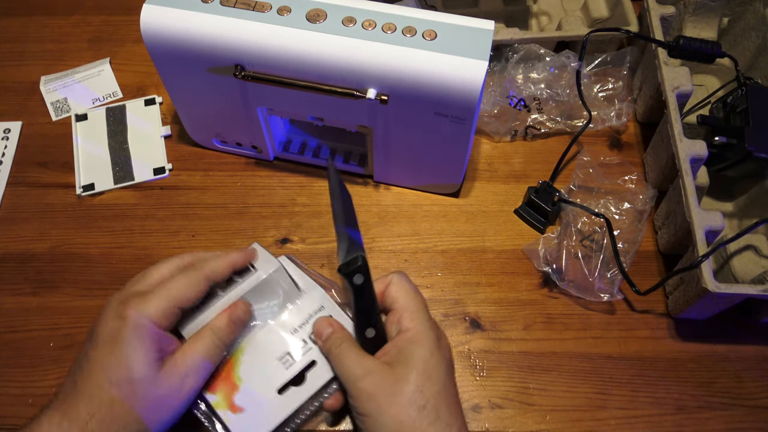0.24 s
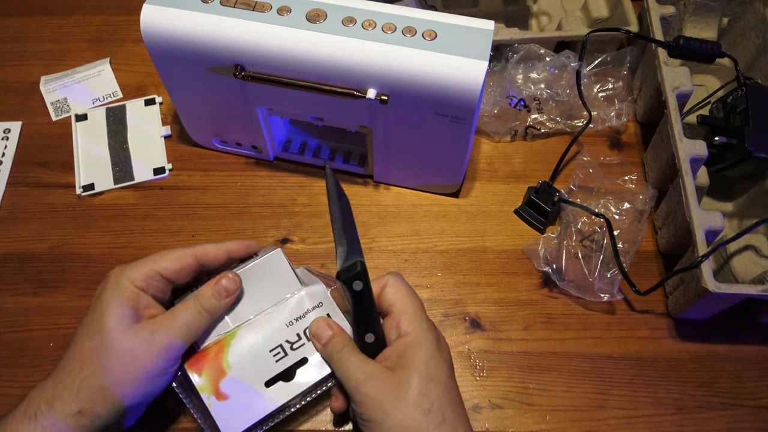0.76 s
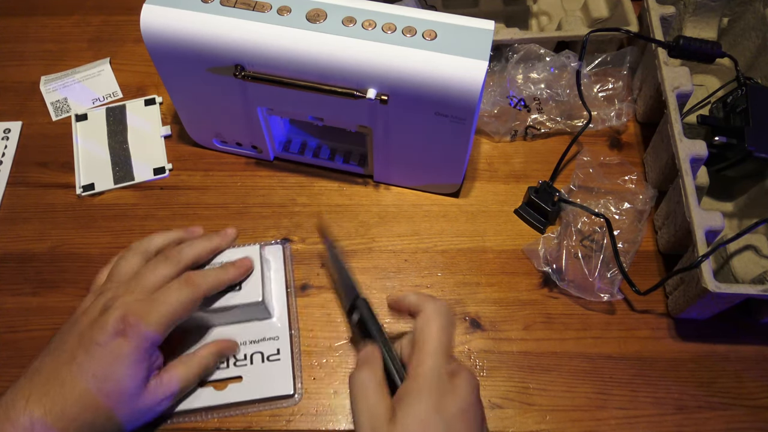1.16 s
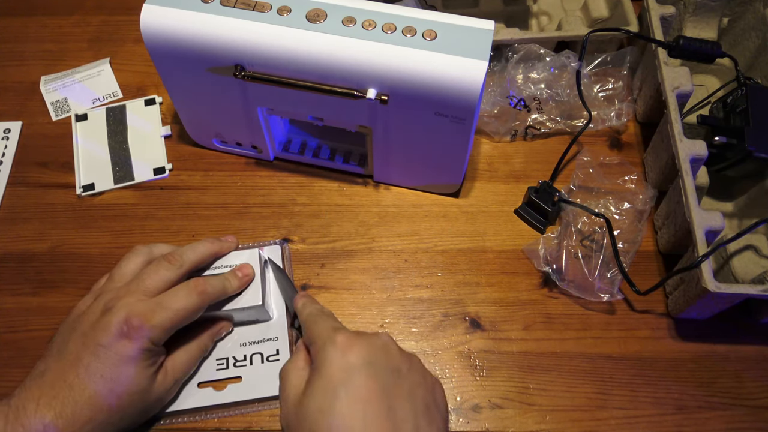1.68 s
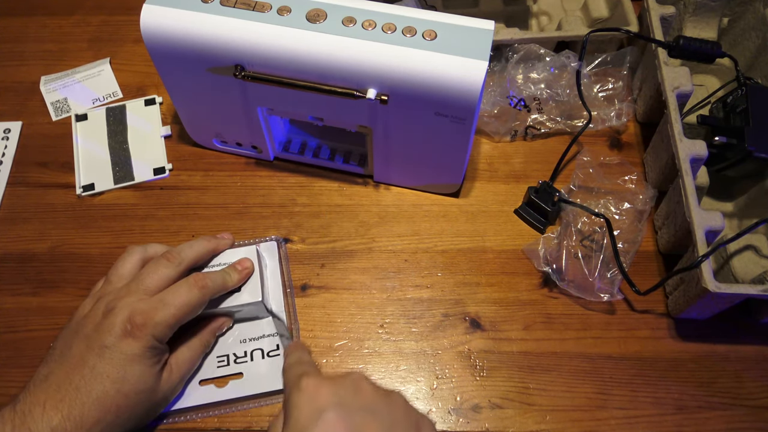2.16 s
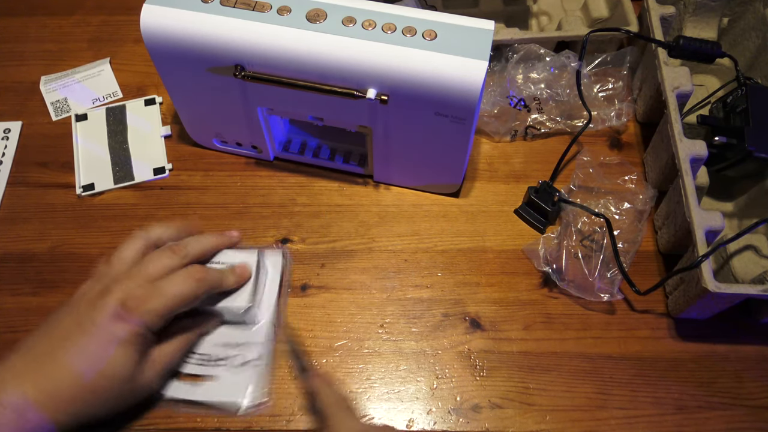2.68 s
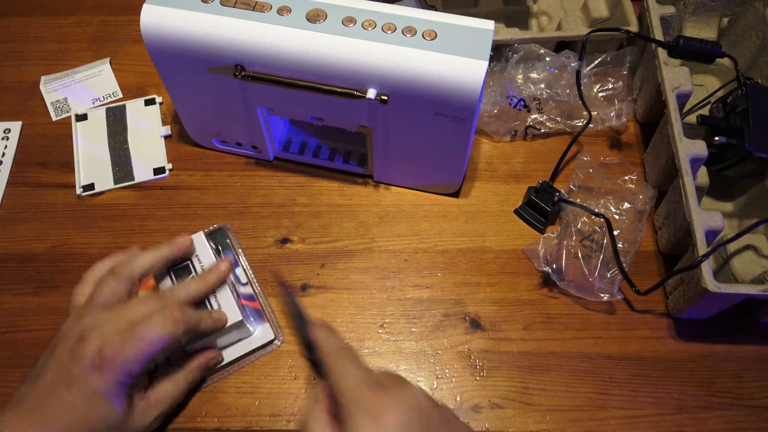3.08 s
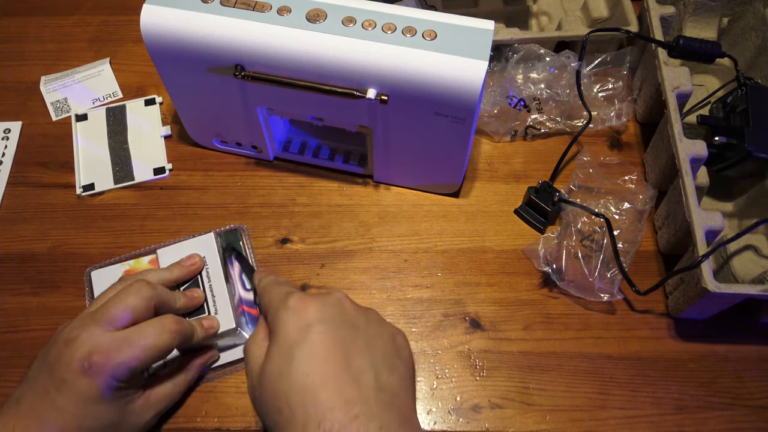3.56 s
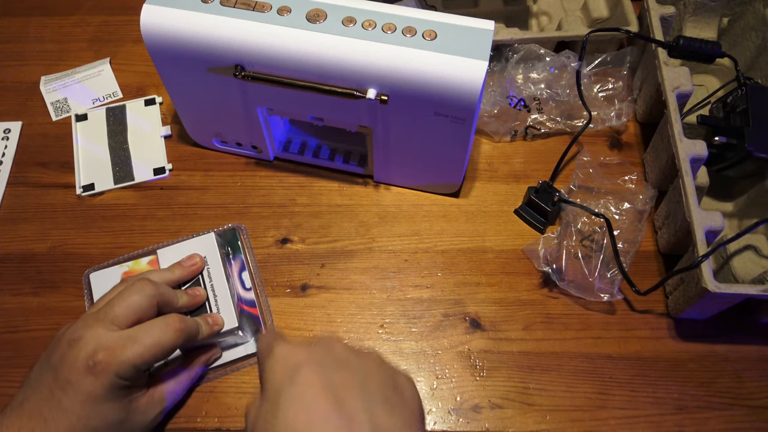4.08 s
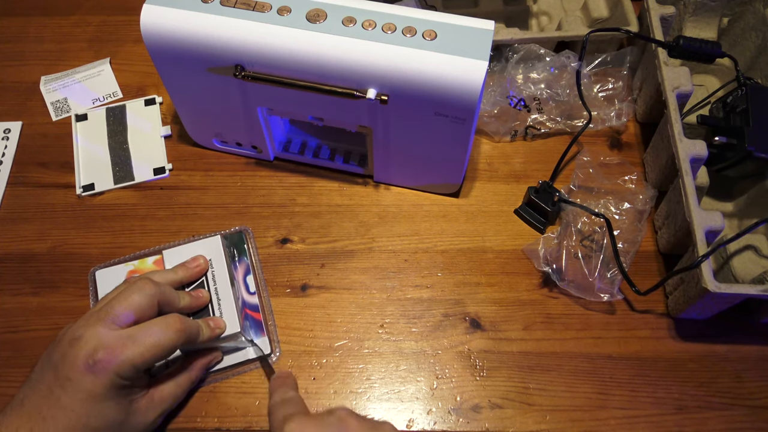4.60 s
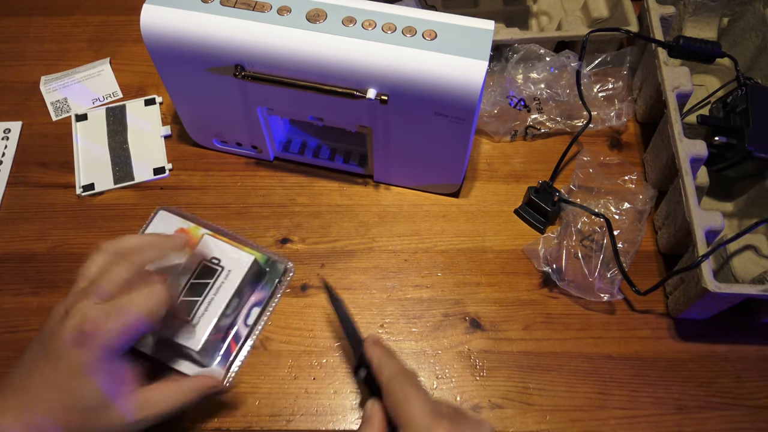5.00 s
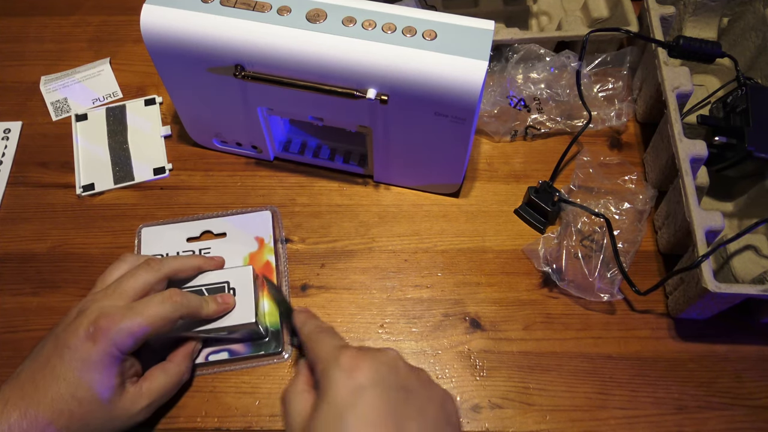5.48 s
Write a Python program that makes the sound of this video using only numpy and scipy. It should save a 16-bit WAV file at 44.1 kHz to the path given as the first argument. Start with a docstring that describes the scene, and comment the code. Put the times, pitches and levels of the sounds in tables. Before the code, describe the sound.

Close up in a small room with a faint dull background, someone cuts open hard plastic packaging on a wooden table. A short tear and sharp crackles lead to scrapes and hollow knocks. Twice the knife pushes through with a thump and a short rattle of the blade, the second time after a fast run of clicks and followed by a squeak. More scraping, knocking and snapping follow as the pack is shifted around.

```python
"""A stiff plastic blister pack is cut open with a knife on a wooden table in a small room. First the seam rips
in a run of fractures; the shell buckles in ticks and snaps, then knocks and scrapes on the wood. Near 2 s the
cut edge whines under friction and the blade breaks through, striking the modes of pack and table. Near 4 s its
serrated edge ratchets along the seam tooth by tooth, breaks through again and squeaks on its way out. Last, the
pack is turned with more scrapes, hollow knocks and snaps."""
import sys
import numpy as np
from scipy import signal
from scipy.fft import rfft, irfft
from scipy.io import wavfile
from scipy.ndimage import uniform_filter1d

SR = 44100
rng = np.random.default_rng(int(sys.argv[2]) if len(sys.argv) > 2 else 0)


def generate_wav(signal):
    """Clip the signal to [-1, 1] and save it as 16-bit WAV at the path in sys.argv[1]."""
    frames = np.transpose(np.atleast_2d(signal))
    scaled = np.clip(frames, -1, 1) * 32767
    pcm = np.round(scaled).astype(np.int16)
    wavfile.write(sys.argv[1], SR, pcm)


N = 253134
TIME = np.arange(N) / SR


def from_db(db):
    """Amplitude ratio of a level."""
    return 10 ** (np.asarray(db) / 20)


def rms_one(x):
    """Normalisation to unit rms."""
    return x / np.sqrt(np.mean(x ** 2) + 1e-20)


def at_hz(points, hz):
    """Interpolation of a spectrum on a log-frequency axis."""
    f, value = np.transpose(points)
    return np.interp(np.log(hz + 1), np.log(f), value)


def bins(size):
    """Frequencies of a discrete Fourier transform."""
    return np.arange(size // 2 + 1) * SR / size


def drift(per_s):
    """Random modulation of unit variance."""
    knots = rng.standard_normal(N // 8)
    return np.interp(TIME * per_s, np.arange(len(knots)), knots) * np.sqrt(3 / 2)


def swell(s, swell_s, hold_s, fade_s):
    """Exponential growth and decay: 20 dB up in swell_s, steady from time s, 20 dB down in fade_s."""
    early, late = np.maximum(s - TIME, 0), np.maximum(TIME - s - hold_s, 0)
    return from_db(-20 * np.minimum(early / swell_s + late / fade_s, 10))


def run_of(start_s, gap_s, jitter, count):
    """Relaxation oscillation: the times of nearly periodic releases."""
    return start_s + gap_s * (np.arange(count) + jitter * rng.standard_normal(count))


def slips(per_s, spread_db, hiss):
    """Shot noise: random impulses over fine friction hiss, at unit rms."""
    sizes = from_db(spread_db * np.minimum(rng.exponential(1, N), 4)) * rng.choice([-1, 1], N)
    impulses = sizes * (rng.random(N) < per_s / SR)
    return rms_one(rms_one(impulses) + hiss * rng.standard_normal(N))


def zones(hz):
    """Shelving weights of bass and treble at each frequency."""
    return at_hz([(550, 1), (1100, 0)], hz), at_hz([(2800, 0), (6000, 1), (14000, 1.3)], hz)


def causal(db):
    """Minimum-phase response of a given magnitude: nothing sounds before the contact."""
    cepstrum = irfft(np.log(from_db(db)))
    half = len(cepstrum) // 2
    cepstrum[1:half] *= 2
    cepstrum[half + 1:] = 0
    return np.exp(rfft(cepstrum))


def peak(hz, centre_hz, width_hz):
    """Lorentzian resonance curve of unit height."""
    return 1 / (1 + (2 * (hz - centre_hz) / width_hz) ** 2)


def resonate(drive, peaks):
    """Forced response of parallel resonances, at unit mean power gain."""
    shape = sum(from_db(db) * peak(bins(N), hz, width) for hz, width, db in peaks)
    return irfft(rfft(drive) * causal(20 * np.log10(rms_one(shape))), N)


# Background spectrum: f/Hz, relative level/dB
BACKGROUND_SPECTRUM = [(25, -14), (55, 6.5), (100, -6), (200, 5), (500, -6.5), (1100, -1.5), (2300, -14.5),
                       (6000, -16), (12000, -21), (16000, -24)]
def room_tone(level_db):
    """Stationary noise, weighted to low frequencies, gives a dull background."""
    spectrum = rfft(rng.standard_normal(N)) * from_db(at_hz(BACKGROUND_SPECTRUM, bins(N)))
    return from_db(level_db) * rms_one(irfft(spectrum, N))


# Reverberation time of the room: f/Hz, T60/s
ROOM_T60 = [(150, 0.58), (500, 0.24), (2000, 0.26), (6000, 0.28), (14000, 0.21)]
def reverberation(x, wet_db, first_s, size=32768):
    """A diffuse field builds up after the first reflection and decays exponentially, slowest in the bass."""
    t, tail = np.arange(size) / SR, 0
    octaves_hz = 80 * 2 ** np.arange(9.)
    for low, high in zip(octaves_hz, octaves_hz[1:]):
        bandpass = signal.butter(2, [low, high], "band", fs=SR, output="sos")
        band = signal.sosfilt(bandpass, rng.standard_normal(size))
        tail = tail + band * from_db(-60 * t / at_hz(ROOM_T60, np.sqrt(low * high)))
    tail *= np.clip(t / first_s - 1, 0, 1)
    return from_db(wet_db) * signal.fftconvolve(x, tail / np.sqrt(np.sum(tail ** 2)))[:N]


# Stereo width: f/Hz, side gain/dB
SIDE_GAIN = [(60, -15), (250, -20), (700, -17), (1400, -24), (2200, -30), (3800, -27), (6000, -17),
             (8000, -13), (14000, -12)]
# Stereo balance: f/Hz, left over right/dB
BALANCE = [(60, -1), (170, -.3), (350, 1.6), (700, 1.4), (1400, .2), (2800, .1), (5600, .4), (14000, 1.2)]
def stereo(mid, diffuse, reflection_s=.0037, reflected=.8):
    """Decorrelation: a lateral reflection and diffuse noise set two nearby receivers slightly apart."""
    hz, spectrum = bins(N), rfft(mid)
    reflection = reflected * spectrum * np.exp(-2j * np.pi * hz * reflection_s)
    side = from_db(at_hz(SIDE_GAIN, hz)) * (reflection + rfft(diffuse))
    lean = from_db(at_hz(BALANCE, hz) / 2)
    return irfft(np.array([(spectrum + side) * lean, (spectrum - side) / lean]), N)


# Loading of the cut edge: t/s at full load, swell/s, hold/s, fade/s, level/dB
EDGE_LOADS = [(1.86, 0.2, 0.097, .03, -56), (2.55, 0.17, .09, .05, -61.5)]
def whine(centre_hz, width_hz):
    """Resonant filtering: fine friction feeds one narrow band as the edge creeps through the plastic."""
    gain = sum(from_db(db) * swell(*timing) for *timing, db in EDGE_LOADS)
    spectrum = rfft(rng.standard_normal(N)) * peak(bins(N), centre_hz, width_hz)
    return gain * rms_one(irfft(spectrum, N))


# Resonances of the shell: f/Hz, width/Hz, boost/dB
SHELL_RESONANCES = [(1127, 51, 2.5), (1194, 86, 5), (1405, 103, 7), (1610, 30, 3.5), (2000, 210, 3),
                    (2570, 57, 1.5), (2980, 62, 5.5), (3660, 150, 2), (3910, 130, 2), (5910, 1700, 4.5),
                    (7820, 130, 4)]
def shell_db(colour, hz, share):
    """Source and filter: the shell's resonances lift a contact spectrum, normalised by its middle band."""
    lift_db = sum(boost * peak(hz, f, width) for f, width, boost in SHELL_RESONANCES)
    db = at_hz(colour, hz) + share * lift_db
    middle = (hz > 800) & (hz < 4000)
    return db - 10 * np.log10(np.mean(from_db(db) ** 2 * middle))


# Sliding of shell or blade: t/s at full speed, swell/s, hold/s, fade/s, level/dB, bass/dB, treble/dB
SLIDING_STROKES = [(0.003, .02, 0.01, 0.095, -43, 2, 7.5), (0.201, 0.11, 0.016, .05, -37, 1, 2),
                   (0.498, .2, 0.31, 0.08, -52.5, 9, 7), (0.875, 0.021, 0.029, 0.027, -30.5, 8.5, -4),
                   (0.907, 0.046, 0.11, 0.093, -36, -7, 6.5), (1.109, 0.068, 0.018, 0.033, -31, 7.5, 1),
                   (1.214, .03, 0.036, 0.24, -53, 4, -0.5), (1.47, .03, 0.084, 0.31, -50, -1, -1),
                   (1.684, 0.015, .025, 0.057, -42.5, 8, -22), (1.814, 0.099, 0.36, .05, -55, 5.5, 2),
                   (2.112, 0.29, 0.066, 0.2, -52.5, 13, 6.5), (2.687, 0.096, 0.076, .05, -40.5, 5.5, 1.5),
                   (2.772, 0.057, 0.069, .06, -27.5, -6, 3.5),
                   (2.932, 0.069, 0.032, 0.095, -38.5, 1.5, -2.5),
                   (3.083, 0.02, 0.013, 0.077, -38, 1.5, 3.5), (3.226, 0.024, 0.015, 0.035, -32.5, 0, 1),
                   (3.283, .05, .02, 0.17, -50.5, 4, -7), (3.604, 0.011, 0.0093, 0.03, -46, 8.5, -0.5),
                   (3.928, 0.034, 0.23, 0.18, -37, 9, 4.5), (4.288, .04, 0.033, 0.21, -46.5, 6.5, 3),
                   (4.464, .1, .07, .3, -58.5, 7, 6), (4.69, .03, .03, 0.09, -55, 6, 0),
                   (4.792, 0.022, 0.11, .05, -36, 2.5, -1.5), (4.909, 0.065, 0.034, 0.074, -28, 0, 0.5),
                   (5.022, 0.064, 0.041, .18, -50, 9, 1), (5.19, 0.036, 0.02, 0.1, -25, 1.5, 2),
                   (5.237, 0.051, 0.018, 0.017, -24, -7, 10), (5.392, 0.036, 0.01, 0.18, -48.5, 5, 5.5),
                   (5.69, 0.088, 0.045, .1, -50, -4, 2)]
def stroke_gains(holding_db=-75):
    """Incoherent strokes add in power, giving bass, middle and treble gains; the fingers never rest."""
    power = np.full((3, N), from_db(holding_db) ** 2)
    for *timing, db, low_db, high_db in SLIDING_STROKES:
        power += np.outer(from_db([db + low_db, db, db + high_db]), swell(*timing)) ** 2
    return np.sqrt(power)


# Spectrum of sliding contact: f/Hz, relative level/dB
SLIDE_SPECTRUM = [(40, -27), (130, -9.5), (260, -1.5), (600, 1), (1200, 3), (2000, 1), (3500, -5.5),
                  (6000, -8.5), (9000, -11.5), (12500, -21), (16000, -33)]
def sliding(gains, gain_db, judder_db):
    """Friction noise: dense slips shake the shell; pressure adds bass and sharp edges add treble."""
    hz = bins(N)
    bass, treble = zones(hz)
    grains = slips(per_s=1800, spread_db=0.0, hiss=0.74) * from_db(judder_db * drift(140))
    shaken = rfft(grains) * from_db(shell_db(SLIDE_SPECTRUM, hz, share=0.51))
    bands = [irfft(shaken * share, N) for share in (bass, 1 - bass - treble, treble)]
    return from_db(gain_db) * sum(band * gain for band, gain in zip(bands, gains))


# Spectrum of the tearing seam: f/Hz, relative level/dB
RIP_SPECTRUM = [(40, -46), (130, -9), (300, -8), (600, -2), (1050, 2), (2000, -1), (3500, -3.5),
                (6000, -7.5), (9000, -8), (12500, -17.5), (16000, -30)]
def rip(start_s, full_s, level_db):
    """Crack propagation: a run of tiny fractures starts abruptly, swells and dies away."""
    gain = from_db(level_db) * (TIME >= start_s) * swell(full_s, swell_s=0.043, hold_s=0.029, fade_s=0.086)
    fractures = slips(per_s=2700, spread_db=-1.5, hiss=0.97) * gain
    return irfft(rfft(fractures) * causal(shell_db(RIP_SPECTRUM, bins(N), share=0.21)), N)


def gripped(x, grips=4, ripple_db=4.4, spacing_hz=90, shifts_per_s=7, overlap_hz=6000):
    """Changing boundary conditions: fingers stiffen and damp the shell, shifting its peaks and dips."""
    hz, spectrum = bins(N), rfft(x)
    out, total = 0, 0
    for _ in range(grips):
        knots = ripple_db * rng.standard_normal(int(SR / spacing_hz))
        knots -= uniform_filter1d(knots, size=5)
        ripple = np.interp(hz / spacing_hz, np.arange(len(knots)), knots)
        ripple /= 1 + (hz / overlap_hz) ** 2  # modal overlap smooths the treble
        held = irfft(spectrum * causal(ripple), N) / np.sqrt(np.mean(from_db(ripple) ** 2))
        weight = np.exp(2 * drift(shifts_per_s))
        out = out + weight * held
        total = total + weight
    return out / total


# Knocks of pack and hand on the table: t/s, ring level/dB, f/Hz, click level/dB
HOLLOW_KNOCKS = [(0.873, -20, 890, -56), (1.0313, -20.5, 292, -30.5), (1.1003, -25, 690, -34),
                 (1.123, -18, 1210, -39), (1.168, -24, 475, -30.5), (1.586, -38.5, 500, -38.5),
                 (1.6866, -26.5, 1140, -55), (2.123, -49.5, 69.6, -61), (2.535, -29, 713, -40.5),
                 (2.7301, -23, 725, -37.5), (3.119, -23, 707, -48), (3.727, -32, 605, -55),
                 (4.324, -44.5, 66.5, -48), (4.8874, -16.5, 552, -30), (4.8986, -16, 740, -36),
                 (5.1737, -17.5, 820, -32.5), (5.1951, -20, 1120, -26), (5.279, -24, 490, -29),
                 (5.3634, -13.5, 1680, -58), (5.5757, -33.5, 558, -45)]
def knocks(gain_db, cycles, overtone_db, size=8192):
    """Damped free vibration: three modes of the hollow pack each lose 60 dB in the given cycles."""
    out, t = np.zeros(N + size), np.arange(size) / SR
    for s, db, hz, _ in HOLLOW_KNOCKS:
        at = int(s * SR)
        for ratio, mode_db in [(1, 0), (1.27, overtone_db), (rng.uniform(1.24, 2.95), overtone_db)]:
            turns = hz * ratio * t
            envelope = from_db(db + gain_db + mode_db - 60 * turns / cycles) * (1 - np.exp(-2 * turns))
            out[at:at + size] += envelope * np.sin(2 * np.pi * turns)
    return out[:N]


# Squeals of the blade in the slit: t/s, duration/s, first f/Hz, last f/Hz, level/dB
BLADE_SQUEALS = [(4.274, 0.025, 6400, 9500, -38), (4.277, .014, 11500, 13000, -45),
                 (4.292, 0.0183, 8970, 14900, -33), (4.351, .012, 15500, 9040, -38),
                 (4.36, .013, 9800, 15800, -44)]
def squeals(roughness_db, ring_t60, waver=.05, size=1024):
    """Fast stick-slip at the blade gives ragged gliding tones, smeared by the ringing shell."""
    tones = np.zeros(N)
    for s, length, first_hz, last_hz, db in BLADE_SQUEALS:
        progress = np.clip((TIME - s) / length, 0, 1)
        hz = first_hz + (last_hz - first_hz) * progress
        phase = 2 * np.pi * np.cumsum(hz * (1 + waver * drift(2500))) / SR
        tones += np.sin(np.pi * progress) * from_db(db + roughness_db * drift(700)) * np.sin(phase)
    shell = rng.standard_normal(size) * from_db(-60 * np.arange(size) / SR / ring_t60)
    return signal.fftconvolve(tones, shell * np.sqrt(2 / np.sum(shell ** 2)))[:N]


# Groan of the slit: t/s, slip rate f/Hz, level/dB
SLIT_GROAN = [(4.273, 720, -35), (4.282, 620, -33.5), (4.294, 585, -27.5), (4.308, 520, -51)]
def groan(slope_db, jitter=.012, harmonics=6):
    """Periodic stick-slip in the slit gives a harmonic series, strongest at the second harmonic."""
    s, hz, db = np.transpose(sorted(SLIT_GROAN))
    gain = (TIME >= s[0]) * (TIME <= s[-1]) * from_db(np.interp(TIME, s, db))
    phase = 2 * np.pi * np.cumsum(np.interp(TIME, s, hz) * (1 + jitter * drift(600))) / SR
    buzz = sum(from_db(slope_db * abs(k - 2)) * np.sin(k * phase) for k in range(1, harmonics + 1))
    return gain * rms_one(buzz)


# Resonances of the seam under the blade: f/Hz, width/Hz, relative level/dB
SEAM_RESONANCES = [(675, 880, -6), (1400, 160, -4), (1910, 450, 3), (3100, 1800, -9.5), (6330, 2600, -21)]
def ratchet(start_s, gap_s, level_db, scatter_db, grit, grit_s):
    """Serrated blade: each tooth catching on the seam sends a click and a little grit into the seam's
    resonances."""
    drive, t = np.zeros(N), np.arange(SR // 20) / SR
    for s in run_of(start_s, gap_s, jitter=0.17, count=12):
        at = int(s * SR)
        slip = (t == 0) + grit * np.exp(-t / grit_s) * rng.standard_normal(len(t))
        drive[at:at + len(t)] += from_db(level_db + scatter_db * rng.standard_normal()) * slip
    return resonate(drive, SEAM_RESONANCES)


# The knife breaks through and lands: t/s, thud level/dB, tilt/(dB/octave), twang level/dB, crack level/dB
KNIFE_LANDINGS = [(1.9475, -8.5, 2, -29, -18.5), (1.9792, -32, -8, -17, -17), (3.919, -6, 0, -38, -20),
                  (3.9622, -7, -2, -30, -13.5)]
# Modes of the pack pressed on the table: f/Hz, relative level/dB, T60/s
PACK_ON_TABLE_MODES = [(150, -28, .12), (214, -29, .2), (257, -18, .33), (301, -23, .3), (328, -12, .11),
                       (352, 0, .042), (394, -13, .1), (417, -23, .28), (496, -21, .12), (565, -19, .07),
                       (662, -11, .06), (735, -4, .04), (800, -17, .11), (1060, -24, .12), (1210, -23, .16)]
def thuds(scatter_db, radiation_hz, pivot_hz=350, size=32768):
    """Modal superposition: each landing rings pack and table; the small table radiates little deep bass."""
    out, t = np.zeros(N + size), np.arange(size) / SR
    for s, thud_db, tilt_db, _, _ in KNIFE_LANDINGS:
        at = int(s * SR)
        for k, (hz, db, t60) in enumerate(PACK_ON_TABLE_MODES):
            mode_db = thud_db + db + tilt_db * np.log2(hz / pivot_hz) + scatter_db * rng.standard_normal()
            out[at:at + size] += (-1) ** k * from_db(mode_db - 60 * t / t60) * np.sin(2 * np.pi * hz * t)
    return signal.sosfilt(signal.butter(2, radiation_hz, "high", fs=SR, output="sos"), out[:N])


# Resonances of the knife and the cut edge it bears on: f/Hz, width/Hz, relative level/dB
BLADE_RESONANCES = [(1450, 300, 1), (1780, 590, -1), (2960, 290, 2.5), (3400, 350, -4), (5300, 3600, -11.5)]
def twang(t60, attack, attack_s=0.0021):
    """Forced vibration: after landing, the blade chatters against the cut edge as it settles."""
    chatter = slips(per_s=6000, spread_db=2.0, hiss=1.0)
    settling = np.zeros(N)
    for s, _, _, db, _ in KNIFE_LANDINGS:
        age = np.maximum(TIME - s, 0)
        settling += (TIME > s) * from_db(db - 60 * age / t60) * (1 + attack * np.exp(-age / attack_s))
    return resonate(chatter * settling, BLADE_RESONANCES)


# Single snaps of the shell: t/s, level/dB, bass/dB, treble/dB
SHELL_SNAPS = [(0.0849, -41.5, 4, -27), (0.1224, -32.5, -3, -13), (0.1959, -12.5, -8, -1),
               (0.3734, -39, -11, 11), (0.6534, -43.5, -15, 6), (0.6796, -31.5, -17, 3),
               (0.7164, -33.5, 2, 2.5), (0.7298, -37.5, 3, 0), (0.756, -35, 9, 3), (0.7715, -34, 5, 1.5),
               (0.816, -38, 1, -2.5), (0.9767, -14, -13.5, -6.5), (1.0159, -28.5, 9, -19),
               (1.4144, -21, -20.5, 3), (1.4734, -37, -9, 1), (1.4832, -29.5, -17, 4.5),
               (1.5132, -32, -9, -16), (1.541, -41, -12, -16), (1.598, -38.5, 8, -7),
               (1.6735, -36.5, -2, -19), (1.9601, -28, 8, 5), (2.1347, -43, 9, 0), (2.4728, -62.5, 15, 13),
               (2.6262, -38.5, 5.5, -8.5), (3.6108, -32, -0.5, -39), (3.7041, -42.5, 5, -5),
               (3.8595, -40, -7, -7), (4.1527, -34, -3, -12), (4.2155, -44, -4, -10), (4.23, -30, 3, -6),
               (4.3197, -31.5, -6, -7), (4.4658, -36, -3, -8), (4.548, -53.5, 6, 8.5), (4.637, -52, 6, 4.5),
               (4.6897, -34.5, -3, -9), (4.7735, -32, 0.5, -14), (4.7892, -35.5, 0, -8.5),
               (5.0621, -48.5, 2, 3), (5.144, -37.5, -5, -1), (5.3632, -20, -12, -1),
               (5.6428, -43, 10.5, -5), (5.6716, -26, -4.5, 0)]
def buckles(stroke_gain, bend_s=.4755, bend_db=-40.5, growth_db_per_s=48, crinkle_db=-8.5, scatter_db=3):
    """Elastic instability: knocks, landings, bending and sliding add buckles to the single snaps."""
    knocked = [(s, click_db, 8, -3.5) for s, *_, click_db in HOLLOW_KNOCKS]
    chopped = [(s, crack_db, 4, -6) for s, *_, crack_db in KNIFE_LANDINGS]
    bent = [(s, bend_db + growth_db_per_s * (s - bend_s), -6, 1.5)
            for s in run_of(bend_s, gap_s=.0247, jitter=0.094, count=6)]
    stroke_db = 20 * np.log10(stroke_gain)
    crinkled = [(at / SR, stroke_db[at] + crinkle_db + scatter_db * rng.standard_normal(), 0, 0)
                for at in rng.integers(0, N, size=40)]
    return SHELL_SNAPS + knocked + chopped + bent + crinkled


# Spectrum of a buckle: f/Hz, relative level/dB
SNAP_SPECTRUM = [(40, -31.5), (130, -36), (260, -5.5), (600, 1), (1100, -1.5), (1900, 0), (3200, -2.5),
                 (6000, -4), (9000, -6.5), (12500, -11.5), (16000, -26.5)]
def snaps(rows, gain_db, crack, ring_t60, bass_db, likeness, bounce_s, bounce, size=4096):
    """Impulse response: a buckle cracks, then crowded modes ring. Returns the sound ahead and all around."""
    out, t, hz = np.zeros((2, N + size)), np.arange(size) / SR, bins(size)
    bass, treble = zones(hz)
    colour_db = shell_db(SNAP_SPECTRUM, hz, share=1.0)
    shared_ring = rng.standard_normal(size)
    table_echo = bounce * (t > bounce_s) * np.exp(-abs(t - bounce_s) / 0.00075)
    envelope = from_db(-60 * t / ring_t60) + crack * np.exp(-t / 0.0004) + table_echo
    scale = np.sqrt(np.sum(envelope ** 2) / np.mean(envelope[t < .009] ** 2))  # level of the first 9 ms
    for s, db, low_db, high_db in rows:
        ring = np.sqrt(likeness) * shared_ring + np.sqrt(1 - likeness) * rng.standard_normal(size)
        modes = rfft(envelope * ring)
        # single modes vary in strength, but neighbours share a steady total
        modes *= causal(-10 * np.log10(uniform_filter1d(abs(modes) ** 2, size=91)))
        contact = scale * causal(colour_db + db + gain_db + (low_db + bass_db) * bass + high_db * treble)
        at = int(s * SR)
        # summed over all directions, the peaks and dips of single modes even out
        out[:, at:at + size] += irfft([contact * modes, contact])
    return out[:, :N]


def scene():
    """Superposition: direct sound of pack, knife and table, plus the room's diffuse field."""
    gains = stroke_gains()
    ahead, around = snaps(buckles(gains[1]), gain_db=-1.93, crack=1.3, ring_t60=0.041, bass_db=2.0,
                          likeness=0.7, bounce_s=0.0069, bounce=0.19)
    shell = sliding(gains, gain_db=-0.5, judder_db=1.98) + rip(start_s=.1953, full_s=0.21, level_db=-16.5)
    pack = gripped(shell) + knocks(gain_db=2.5, cycles=21.0, overtone_db=-12.0)
    knife = thuds(scatter_db=1.3, radiation_hz=173) + twang(t60=0.25, attack=0.75)
    squeak = squeals(roughness_db=7.0, ring_t60=0.028) + groan(slope_db=-2.5)
    edge = whine(centre_hz=3700, width_hz=720)
    seam = ratchet(start_s=3.7135, gap_s=.0107, level_db=-16.5, scatter_db=0.5, grit=.065, grit_s=0.009)
    handling = pack + knife + squeak + edge + seam
    room = reverberation(around + handling, wet_db=-9.0, first_s=0.002) + room_tone(level_db=-58.0)
    return stereo(ahead + handling + room, diffuse=room_tone(level_db=-52))


def record(dry, ceiling=.68, cutoff_hz=16000):
    """Soft saturation rounds the highest peaks; a low-pass filter limits the bandwidth."""
    lowpass = signal.cheby1(12, .05, cutoff_hz, fs=SR, output="sos")
    return signal.sosfiltfilt(lowpass, ceiling * np.tanh(dry / ceiling))


dry = scene()
out = record(dry)
generate_wav(out)
```